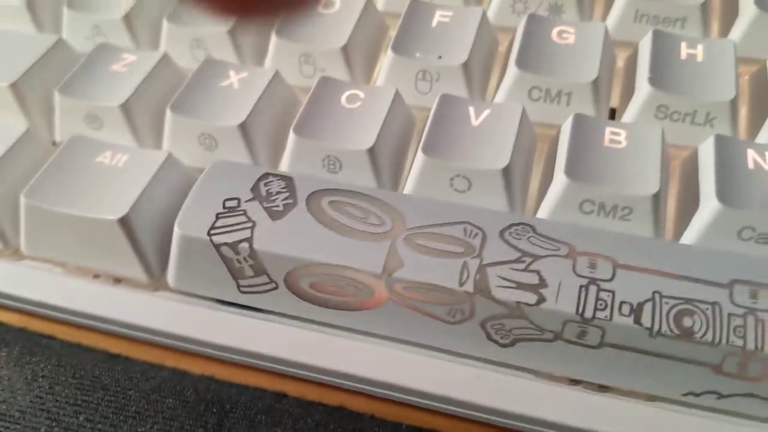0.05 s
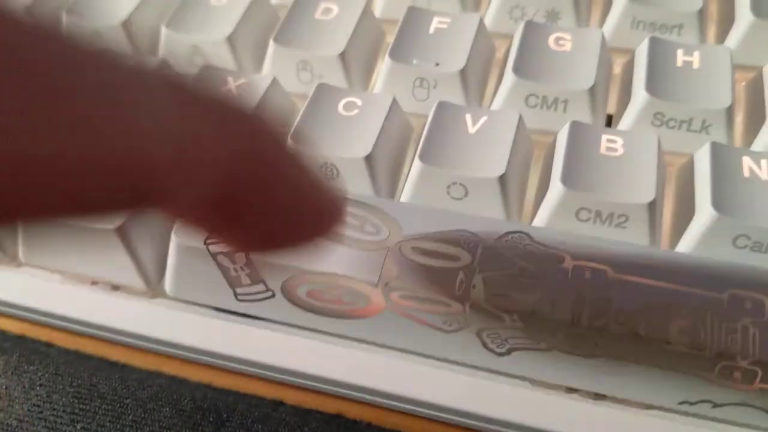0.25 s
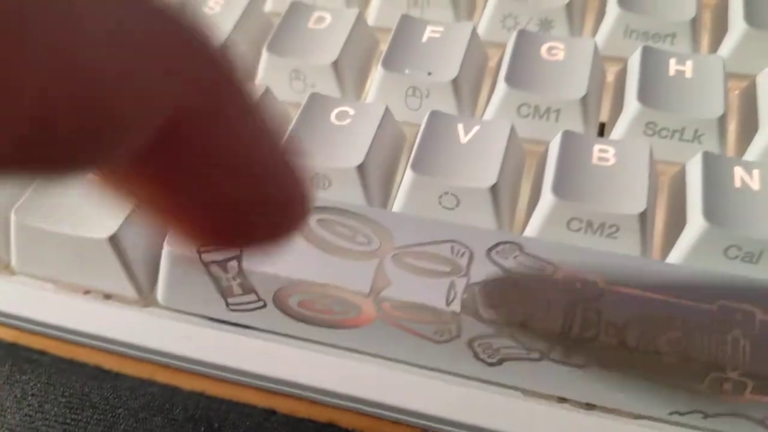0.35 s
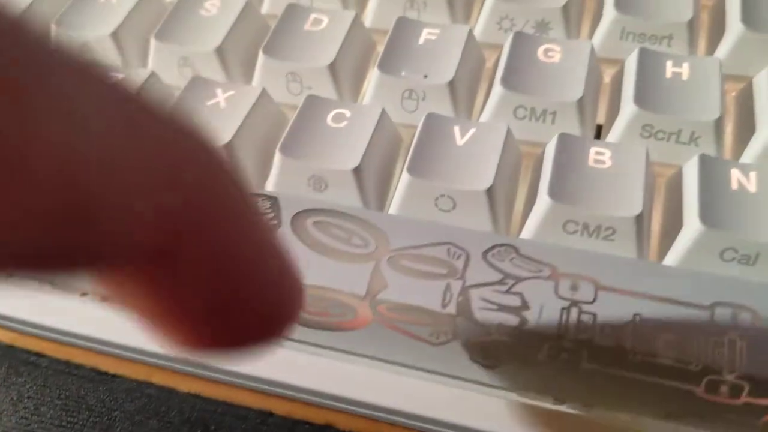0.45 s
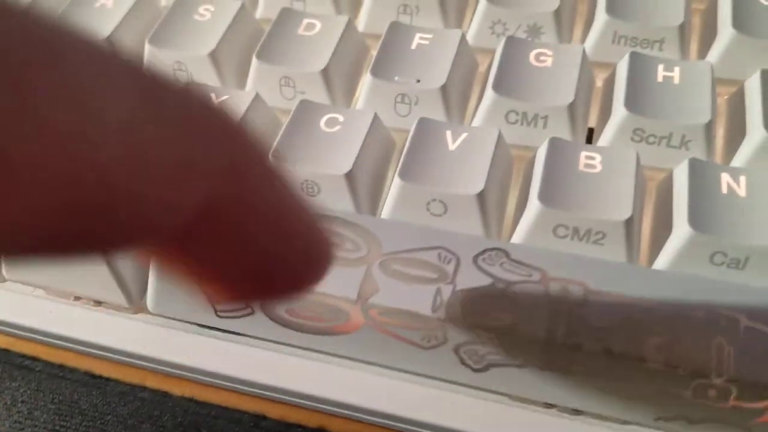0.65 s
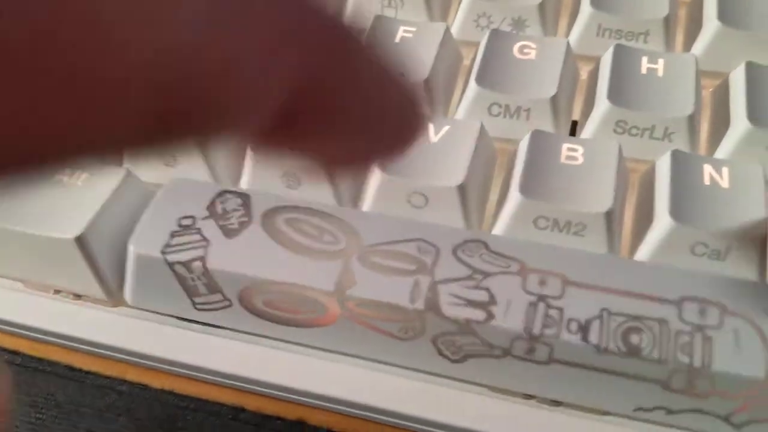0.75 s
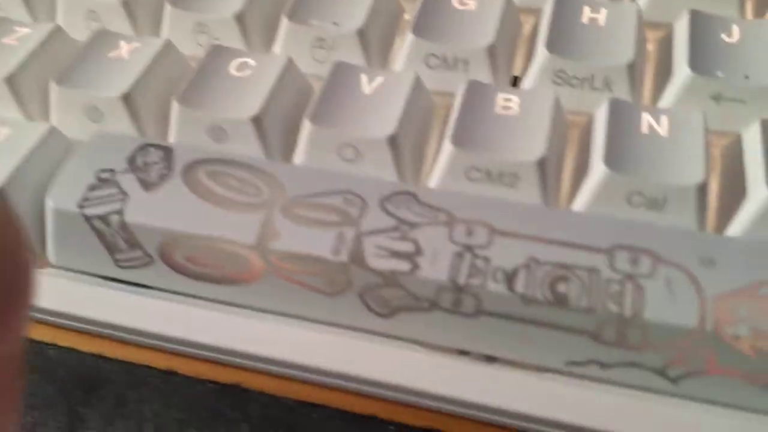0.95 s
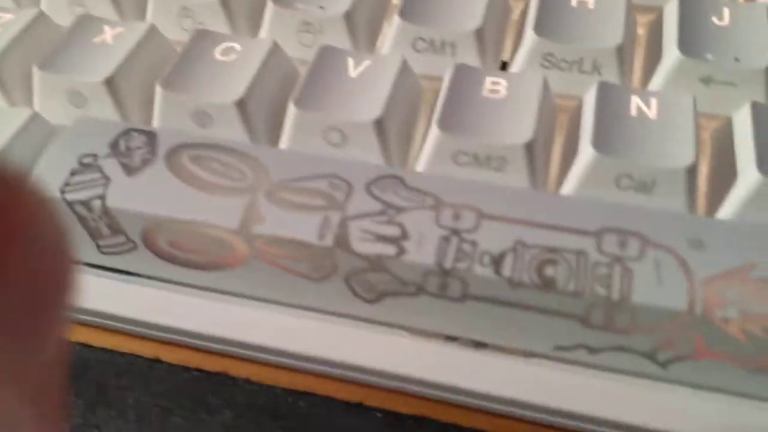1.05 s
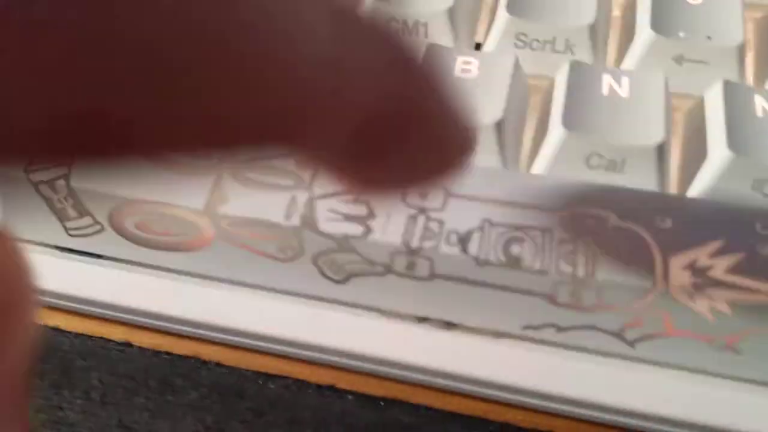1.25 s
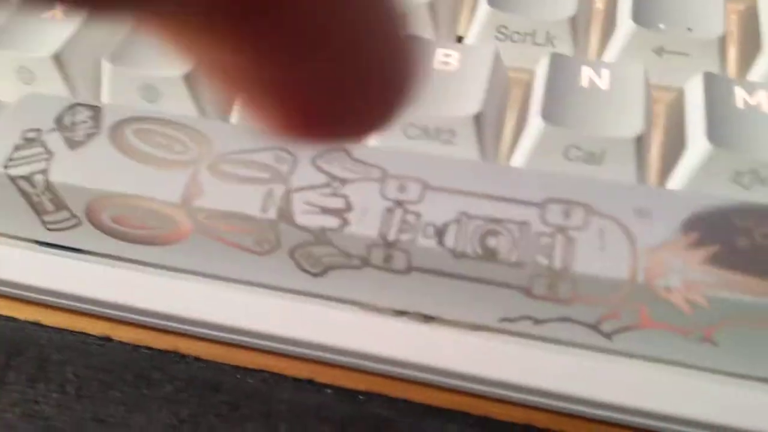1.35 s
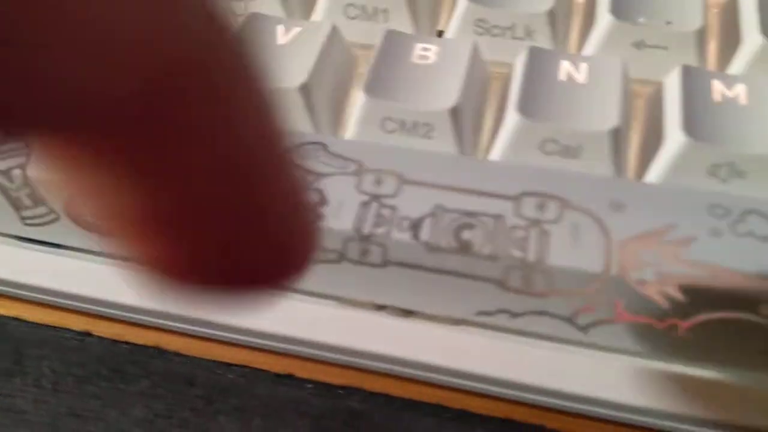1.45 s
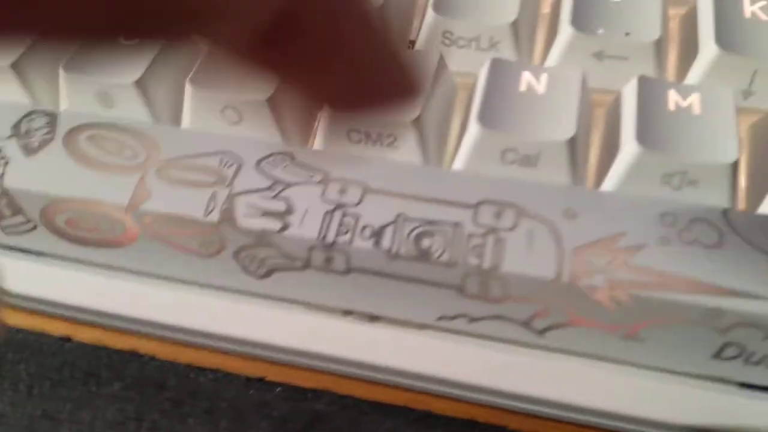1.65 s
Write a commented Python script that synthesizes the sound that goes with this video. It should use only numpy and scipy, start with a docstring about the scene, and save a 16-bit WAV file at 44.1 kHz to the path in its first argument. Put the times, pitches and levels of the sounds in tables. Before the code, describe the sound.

A keyboard spacebar clacks sharply twice, each press followed by a softer release click.

```python
"""Two spacebar strokes.

A finger strikes the spacebar of a mechanical keyboard twice, close by in a quiet room. Each stroke is
a quick cluster of plastic contacts that ring the bar and thump the desk. A tenth of a second later the
bar springs back with a duller click and a spring sings faintly. The hand bumps softly; a fan hums."""
import sys
import numpy as np
from scipy import signal
from scipy.fft import rfft, irfft
from scipy.io import wavfile
from scipy.ndimage import uniform_filter1d

SR = 44100
rng = np.random.default_rng(int(sys.argv[2]) if len(sys.argv) > 2 else 0)


def file_out(sig):
    """Save sig as 16-bit WAV at sys.argv[1]."""
    # one column per channel
    cols = np.atleast_2d(sig).T
    # limit, then scale
    lim = np.clip(cols, -1, 1)
    pcm = np.round(lim * 32767).astype(np.int16)
    wavfile.write(sys.argv[1], SR, pcm)


N = 74970
T = np.arange(N) / SR
HZ = np.fft.rfftfreq(2 * N, 1 / SR)
CLICK_SAMPLES = 4096
CLICK_HZ = np.fft.rfftfreq(CLICK_SAMPLES, 1 / SR)


# Bar resonances. Each row: frequency in Hz, width in Hz, level in dB when struck at the end,
# when struck further in, on release, left over right in dB.
BAR_MODES = [(447, 51, -1, -3.5, 5, 7.5), (900, 80, 4.5, 10, 9, 7), (1079.5, 130, -0.5, 2.5, 4.5, 6.5),
             (1534, 150, 6, 14, 10.5, -2), (1556, 89, 13, -6.5, -2, -8), (2145, 100, 16, -1.5, 11, -1.5),
             (2460, 52, -3, 15.5, 12.5, -5.5), (2705, 160, 8, 16.5, 18, -0.5), (2880, 220, 2, 4, 11.5, 1),
             (3850, 510, 2, 1.5, -1.5, -5), (5600, 250, 2.5, 9, 2.5, 0.5), (5730, 270, 7, 14, 0.5, 6.5),
             (9700, 600, 2, 4, 2, -2.5), (11600, 500, -3.5, -6, 2.5, 9.5), (15000, 310, 8.5, 7.5, 10, 10.5)]
# Dips between resonances. Each row: frequency in Hz, width in Hz, gain in dB.
BAR_DIPS = [(636, 90, -2), (1890, 130, -9.5), (3580, 200, -3), (6530, 580, -4.5)]
# Plastic-on-plastic crack. Each row: frequency in Hz, spectral level in dB.
CRACK_SPECTRUM = [(100, -10), (300, -6), (560, -9.5), (1000, -1.5), (2000, -3), (3500, -2), (6000, -3.5),
                  (8500, -2.5), (11000, -3), (15500, -2.5)]


def contact(mode_db, cutoff_hz, crack_db):
    """One contact: a broad crack plus the bar's resonances. A soft touch has a low cutoff."""
    power = undb(crack_db + curve(CRACK_SPECTRUM, CLICK_HZ)) ** 2
    for (hz, width_hz, *_, pan_db), db in zip(BAR_MODES, mode_db):
        power = power + (undb(db) * pan(pan_db)) ** 2 * resonance(hz, width_hz)
    dips = undb(sum(db * resonance(hz, width_hz) for hz, width_hz, db in BAR_DIPS))
    rolloff = 1 + (CLICK_HZ / cutoff_hz) ** 4
    return minimum_phase(dips * np.sqrt(power / rolloff))


# Each row: start in seconds, level in dB, cutoff in Hz, place on the bar 0-1, left over right in dB.
DOWN_CONTACTS = [(0.2188, -28, 15000, 0, 3.5), (0.2215, -11, 16000, 0, 12.5), (0.2240, -7, 1900, 0.44, -7),
                 (0.2264, 2.5, 15000, 0.0, -1), (0.2297, -4.5, 14230, 0.3, 3),
                 (0.2780, -14, 1400, 0.3, 1.5), (1.1985, -27, 5000, 0.95, 5),
                 (1.2012, -19.5, 2500, 0.9, 6.5), (1.2043, 1.5, 9000, 0.91, 0),
                 (1.2088, -11.5, 17830, 0.37, 7), (1.255, -18.5, 1925, 0.34, -1)]
# Each row: start in seconds, level in dB, cutoff in Hz, left over right in dB.
UP_CONTACTS = [(0.3183, -33.5, 2500, -27), (0.3280, -19, 2420, 10), (0.3294, -24, 5060, -15.5),
               (0.3360, -24, 9400, 4.5), (1.302, -28.5, 2337, 8), (1.3157, -20, 12140, 1),
               (1.3180, -13, 3400, -1)]


def spacebar(ring_db):
    """The bar goes down and springs back. Where it is struck sets which resonances speak."""
    end_db, inner_db, release_db = np.array(BAR_MODES).T[2:5] + ring_db
    clicks = 0
    for start_s, db, cutoff_hz, place, pan_db in DOWN_CONTACTS:
        mode_db = end_db + place * (inner_db - end_db)
        click = contact(mode_db, cutoff_hz, crack_db=0)
        clicks += at(click * undb(db) * pan(pan_db), start_s)
    for start_s, db, cutoff_hz, pan_db in UP_CONTACTS:
        click = contact(release_db, cutoff_hz, crack_db=-3)
        clicks += at(click * undb(db) * pan(pan_db), start_s)
    return undb(8.5) * clicks


# Paths among the keys. Each entry: nominal delay in seconds.
CASE_LAGS_S = [.00013, .00037, .0008, .0015]


def case_response(gain=.69, spread=.3):
    """Short all-pass paths among the keys smear a click, differently on each side."""
    response = 1
    for lag_s in CASE_LAGS_S:
        lag_samples = np.round(lag_s * SR * np.exp(spread * rng.uniform(-1, 1, (2, 1))))
        delay = np.exp(-2j * np.pi * CLICK_HZ * lag_samples / SR)
        response = response * (gain + delay) / (1 + gain * delay)
    return irfft(response)


# Each row: start in seconds, level in dB, tilt in dB per octave.
DESK_THUMPS = [(0.2370, 1, -0.5), (0.334, -18, 3), (1.216, -1, -1.5), (1.329, -14.5, 9.5)]
# Each row: frequency in Hz, T60 in seconds, level in dB.
DESK_MODES = [(55, 0.076, -43.5), (79, 0.37, -36), (105, 0.21, -27), (155.5, 0.14, -33), (239.6, .45, -46),
              (342, 0.33, -56.5)]


def desk(build_s=.0024, pivot_hz=105, right_lag_s=.00017):
    """The desk booms just after each blow. Light blows favour its higher modes."""
    attack = 1 - np.exp(-T / build_s)
    booms = 0
    for start_s, level_db, tilt_db in DESK_THUMPS:
        boom = sum(undb(db + tilt_db * np.log2(hz / pivot_hz)) * ring(hz, t60_s)
                   for hz, t60_s, db in DESK_MODES)
        booms += at(boom * attack * undb(level_db) * pan(0), start_s)
    left, right = booms
    return np.array([left, np.interp(T - right_lag_s, T, right)])


# Each row: start in seconds, level in dB.
SPRING_PINGS = [(0.332, -69), (1.318, -57.5)]
# Each row: frequency in Hz, T60 in seconds, level in dB.
SPRING_MODES = [(899, .35, -5), (1173, .7, 0)]


def spring():
    """The spring rings thinly after each release."""
    ping = sum(undb(db) * ring(hz, t60_s) for hz, t60_s, db in SPRING_MODES)
    return sum(at(ping * undb(db) * pan(0), start_s) for start_s, db in SPRING_PINGS)


# Each row: centre in seconds, level in dB, frequency in Hz, half-length in seconds.
HAND_BUMPS = [(0.722, -57, 170, 0.002), (0.786, -60.5, 599.4, 0.0012), (0.791, -53.5, 254, .004),
              (0.798, -56.5, 118, 0.0077), (0.804, -51.5, 48.02, 0.01), (1.1125, -43, 370, 0.0017)]


def hand():
    """Padded bumps, a cycle or two long, as the hand moves between strokes."""
    bumps = 0
    for centre_s, db, hz, half_s in HAND_BUMPS:
        t = T - centre_s
        bumps += undb(db) * np.exp(-(t / half_s) ** 2) * np.sin(2 * np.pi * hz * t)
    return bumps


def early_reflections():
    """Dense scatter off keyboard and desk, then a bounce from nearby surfaces."""
    scatter = unit_energy(stereo_noise() * decay(t60_s=.028))
    bounce = unit_energy(stereo_noise() * decay(t60_s=.055))
    return undb(-5) * scatter + undb(-12.5) * at(bounce, start_s=.0108)


# Each row: band centre in Hz, level in dB, T60 in seconds.
ROOM_BANDS = [(100, 2.5, .6), (300, 0, 0.31), (800, -15, 0.49), (1420, -11, 0.37), (2448, -6, 0.25),
              (5200, -1.5, 0.15), (9500, -0.5, 0.14), (15000, -4, .15)]


def room_tail(build_s=.006):
    """The room's response, band by band. The treble dies first."""
    noise = stereo_noise()
    attack = 1 - np.exp(-T / build_s)
    centres_hz = np.array(ROOM_BANDS)[:, 0]
    tail = 0
    for (_, db, t60_s), one_hot in zip(ROOM_BANDS, np.eye(len(ROOM_BANDS))):
        band = filtered(noise, np.interp(HZ, centres_hz, one_hot))
        tail += undb(db) * band * unit_energy(decay(t60_s) * attack)
    return tail / np.std(noise)


# Each row: frequency in Hz, relative level in dB.
FAN_TONES = [(398.4, -80), (527.6, -75), (592.2, -93.5)]


def fan(wander=.004, gain_db=-1):
    """A fan hums, its tones wavering slightly together."""
    drift = unit_rms(uniform_filter1d(rng.standard_normal(N), size=2000))
    warped_s = np.cumsum(1 + wander * drift) / SR
    hum = sum(undb(db) * np.sin(2 * np.pi * hz * warped_s) for hz, db in FAN_TONES)
    return np.sqrt(2) * undb(gain_db) * hum


# Each row: frequency in Hz, relative spectral level in dB.
AIR_SPECTRUM = [(15, -28.5), (25, -2), (93, -5), (148, -13), (188, -9), (281, -9.5), (368, -10),
                (457, -18.5), (537, -6), (648, -16.5), (895, -13.5), (1050, -23.5), (1170, -20.5),
                (1850, -24), (3720, -20.5), (5010, -24.5), (5880, -23.5), (12500, -30), (15500, -27.5)]


def room_air(level_db=-67):
    """Faint steady room noise, slightly to the left."""
    noise = filtered(stereo_noise(mono_below_hz=500), undb(curve(AIR_SPECTRUM, HZ)))
    return unit_rms(noise) * undb(level_db) * pan(2)


def undb(db):
    return 10 ** (np.asarray(db) / 20)


def unit_energy(x):
    return x / np.sqrt(np.mean(np.sum(x ** 2, axis=-1)))


def unit_rms(x):
    return unit_energy(x) * np.sqrt(N)


def pan(left_over_right_db):
    return undb(np.array([[1], [-1]]) * left_over_right_db / 2)


def filtered(x, gain):
    return irfft(rfft(x, 2 * N) * gain)[..., :N]


def convolve(x, response):
    return signal.fftconvolve(x, response, axes=-1)[:, :N]


def curve(table, hz):
    """Interpolate (Hz, dB) rows over log frequency."""
    knots_hz, db = np.array(table).T
    return np.interp(np.log(hz + 1e-9), np.log(knots_hz), db)


def decay(t60_s):
    return np.exp(-np.log(1000) * T / t60_s)


def ring(hz, t60_s):
    return np.sin(2 * np.pi * hz * T) * decay(t60_s)


def resonance(hz, width_hz):
    """Power curve of one mode."""
    return 1 / (1 + (2 * (CLICK_HZ - hz) / width_hz) ** 2)


def at(x, start_s):
    """Place a stereo sound on the timeline."""
    out, start = np.zeros((2, N)), int(start_s * SR)
    part = x[:, :N - start]
    out[:, start:start + part.shape[1]] = part
    return out


def minimum_phase(gain):
    """Shortest causal pulse with this spectrum."""
    cepstrum = irfft(np.log(gain))[:, :CLICK_SAMPLES // 2]
    cepstrum[:, 1:] *= 2
    return irfft(np.exp(rfft(cepstrum, CLICK_SAMPLES)))


def stereo_noise(mono_below_hz=1000):
    """White noise, alike on both sides in the bass, unrelated in the treble."""
    mid, side = rng.standard_normal((2, N))
    width = HZ / np.hypot(HZ, mono_below_hz)
    return filtered(mid, np.sqrt(2 - width ** 2)) + filtered(side, width) * np.array([[1], [-1]])


def scene():
    """Spacebar and hand, direct and reflected, with desk, spring, air and fan."""
    bumps = hand()
    direct = convolve(spacebar(ring_db=0), case_response())
    room_send = spacebar(ring_db=-6) + undb(-12.5) * bumps
    reflected = convolve(room_send, early_reflections() + room_tail())
    return direct + reflected + desk() + spring() + bumps + room_air() + fan()


def record(dry):
    """Rumble filter, soft clip, steep treble cut."""
    low_cut_hz, ceiling, top_hz = 10, .9, 15950
    highpass = signal.butter(1, low_cut_hz, "high", fs=SR, output="sos")
    lowpass = signal.ellip(10, .2, 80, top_hz, fs=SR, output="sos")
    rounded = ceiling * np.tanh(signal.sosfilt(highpass, dry) / ceiling)
    return signal.sosfilt(lowpass, rounded)


dry = scene()
out = record(dry)
file_out(out)
```